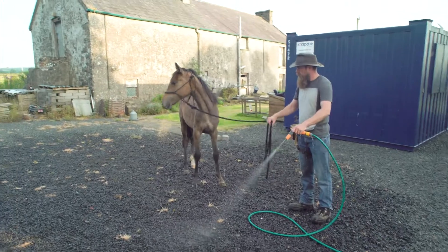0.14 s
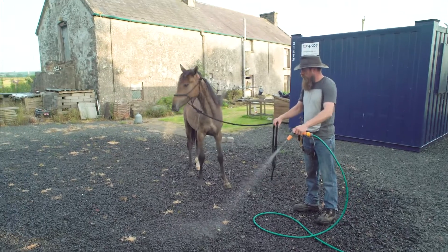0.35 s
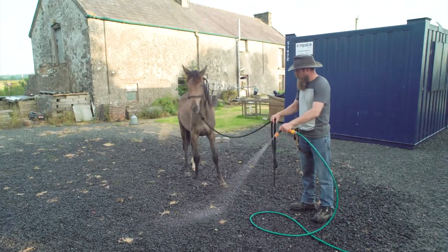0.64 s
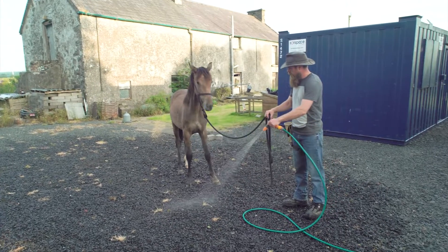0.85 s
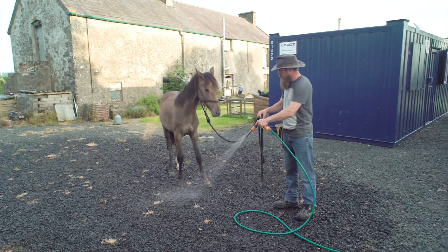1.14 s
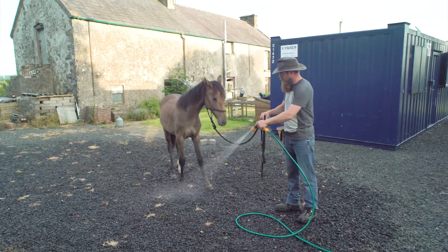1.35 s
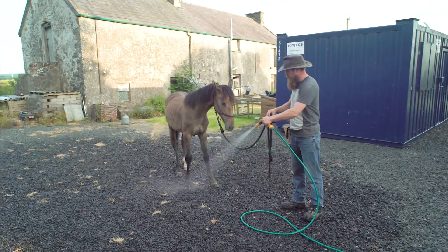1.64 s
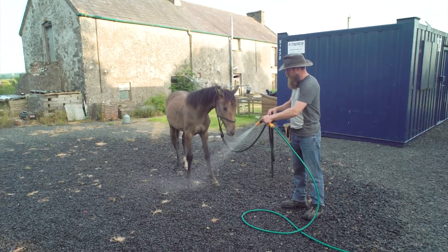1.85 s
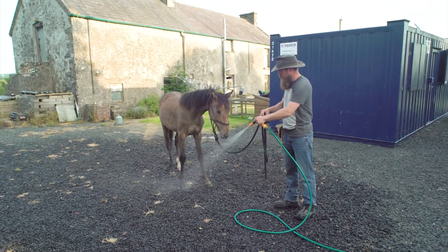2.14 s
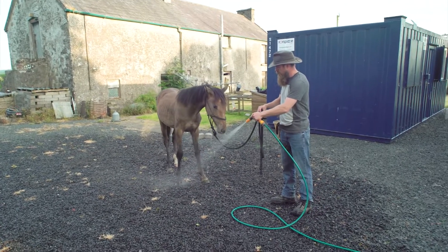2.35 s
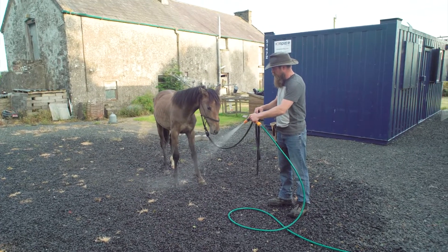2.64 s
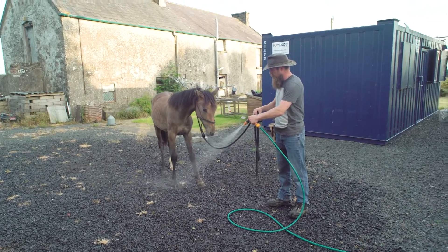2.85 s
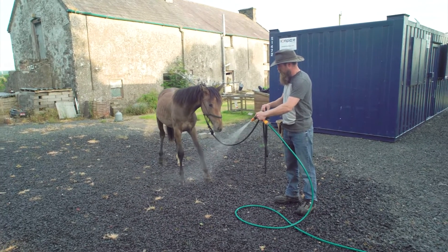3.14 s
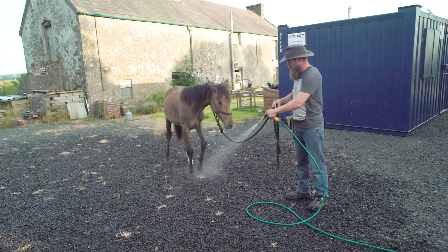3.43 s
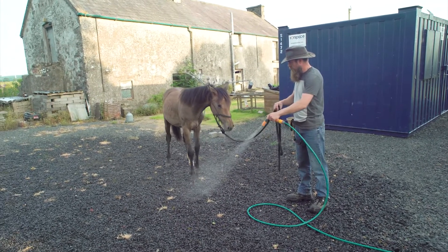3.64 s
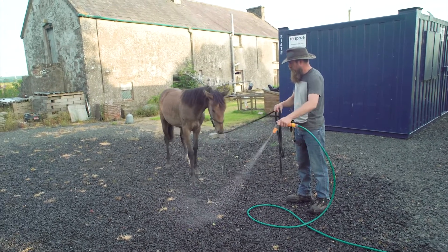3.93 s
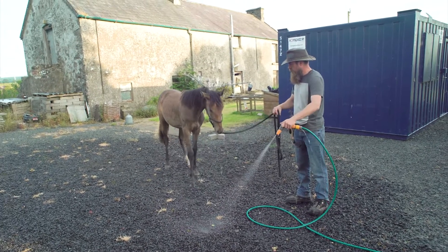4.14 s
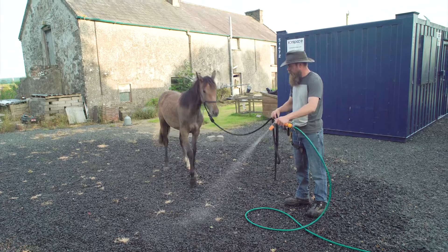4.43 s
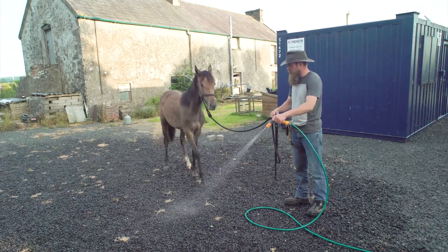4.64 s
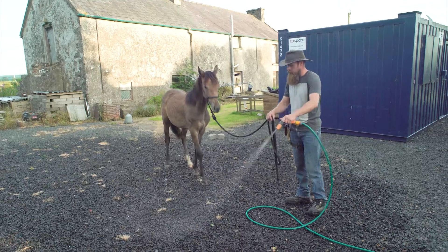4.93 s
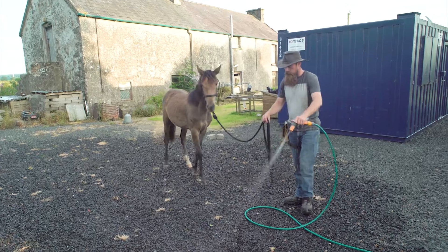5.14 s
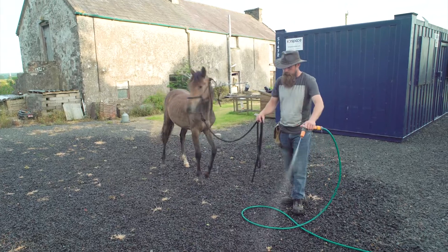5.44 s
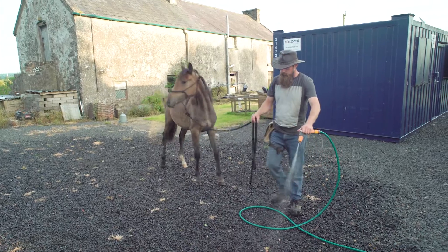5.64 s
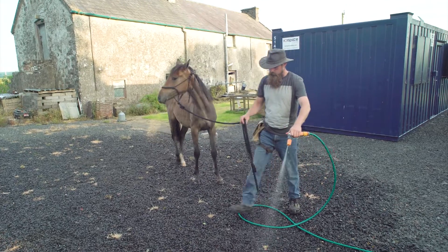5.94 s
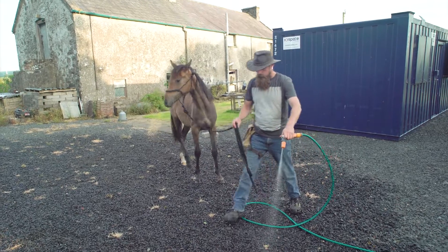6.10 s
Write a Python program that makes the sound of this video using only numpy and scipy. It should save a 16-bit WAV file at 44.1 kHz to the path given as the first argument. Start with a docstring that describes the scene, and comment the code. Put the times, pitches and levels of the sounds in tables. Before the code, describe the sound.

Water from a hose hisses and patters on wet gravel and a horse outdoors, with scattered crunching hoof and boot steps.

```python
"""Hosing down a horse

A garden hose sprays farmyard gravel and a young horse's legs. The jet is a cloud of tiny impacts that
hisses on bare stone and dulls on the wet coat; big drops tick and plip. Hooves and boots knock and
crunch in the gravel, and the yard walls answer dully. Underneath, the air rumbles faintly, the
hand-held microphone sways and one gust buffets it."""
import sys
import numpy as np
from scipy import signal
from scipy.fft import rfft, irfft, next_fast_len
from scipy.io import wavfile
from scipy.ndimage import uniform_filter1d

SR = 44100
rng = np.random.default_rng(int(sys.argv[2]) if len(sys.argv) > 2 else 0)


def put_to_file(sound):
    """Save the sound as 16-bit audio at rate SR, in the file named by the first command-line argument."""
    columns = np.atleast_2d(sound).T  # one column per channel
    safe = np.clip(columns, -1, 1)
    whole_steps = np.round(safe * 32767)
    wavfile.write(sys.argv[1], SR, whole_steps.astype(np.int16))


N = 276507
TIME = np.arange(N) / SR
ON_LEGS_S, OFF_LEGS_S, AT_BOOTS_S = 2.1, 3.4, 5.08   # where the jet is aimed

# Levels in the tables are relative: each layer sets its own trim.
# how hard the jet lands as the nozzle swings about: (time [s], level [dB])
JET_STRENGTH = [(0.0, 3.5), (0.2, 3), (0.32, 3), (0.41, 5), (0.53, 3), (0.76, 0.5), (1.75, -3.5), (1.9, -4),
                (2.02, -1.5), (2.87, -2), (2.95, -2.5), (3.05, -2.5), (3.51, -5.5), (3.61, -2.5),
                (3.93, -1.7), (4.09, 2.5), (4.43, 4.0), (4.66, -1.2), (4.77, -1), (4.8, 3), (4.95, 0.5),
                (5.31, 1.9), (5.39, 3.5), (5.81, 5), (6.27, 7)]
# tone of the wash and splash: (frequency [Hz], gain [dB])
WATER_EQ = [(100, -30), (180, -9.5), (310, -6.5), (460, -2), (630, -7), (740, -5), (980, -6), (1400, -3),
            (2400, 3.5), (3150, -2), (3700, 0), (4600, -5), (5600, 0.5), (7500, -3)]
# tone of the fine mist: (frequency [Hz], gain [dB])
MIST_EQ = [(6000, -3), (7500, -1.7), (8600, -3), (10000, -1.2), (12300, 0), (14500, -1), (16000, -2.5)]
# by the boots the mist loses its sheen: (frequency [Hz], gain [dB])
BOOTS_EQ = [(6000, 5.0), (9000, 1.5), (12500, -0.5), (15500, -3.5)]
# a slight scoop in the mist of a strong jet: (frequency [Hz], gain [dB])
STRONG_JET_EQ = [(6500, -0.77), (8500, -1.5), (10500, -0.3), (13000, -0.2)]
# the jet slaps a leg or a puddle: (time [s], level [dB], half length [s], centre [Hz], Q)
JET_SLAPS = [(0.188, -43, 0.011, 3400, 1.1), (0.395, -44.5, 0.025, 3000, 1.3),
             (0.44, -47, 0.027, 3400, 2.5), (1.1, -56, .05, 2000, 1.5), (2.135, -54, 0.063, 2200, 1.1),
             (2.631, -47, 0.013, 3600, 1.5), (2.825, -51, 0.025, 3600, 3.2), (3.07, -52, .02, 3680, 3.4),
             (3.138, -46, 0.007, 3680, 3.2), (3.246, -48.5, 0.045, 3430, 3.2),
             (3.432, -50, 0.024, 3500, 4.2), (3.632, -51, 0.033, 3620, 5.6), (5.767, -44, 0.018, 3950, 3.8),
             (6.174, -51, 0.12, 3830, 4.5)]
# the spray rings hollow near the boots: (time [s], level [dB], half length [s], pitch [Hz])
HOLLOW_RINGS = [(5.168, -53.5, 0.11, 745), (5.2, -52.5, 0.058, 1196), (5.487, -52, 0.068, 735)]
# the biggest drops crack on stone: (time [s], level [dB], pitch [Hz])
DROP_TICKS = [(0.1765, -31, 13200), (0.291, -26, 9200), (0.4527, -29.5, 11200), (1.0152, -34, 11000),
              (1.0417, -36, 11000), (1.335, -26.5, 12700), (1.578, -36, 12200), (1.6284, -34, 13400),
              (1.8116, -30, 12400), (1.8255, -35, 12000), (1.9696, -35, 12500), (2.0844, -29, 11900),
              (2.0993, -37, 9500), (2.1531, -36, 12500), (2.211, -35.5, 9000), (2.2655, -33, 10300),
              (2.3526, -31, 10700), (2.4071, -32, 10100), (2.4748, -38, 11000), (2.5202, -36, 6700),
              (2.7731, -36, 6400), (2.861, -27.5, 9300), (3.0283, -35, 9500), (3.1005, -35, 10000),
              (3.1553, -37, 7900), (3.408, -36, 13000), (3.6917, -34, 13500), (3.7779, -31, 13500),
              (3.9426, -32, 11800), (3.9689, -33, 12300), (3.9735, -32, 11200), (3.9962, -29.5, 13700),
              (4.0638, -24, 13000), (4.0755, -31, 12400), (4.2283, -33, 3700), (4.4537, -33, 6700),
              (4.5396, -28, 12000), (4.7848, -31, 12700), (5.0222, -31, 12000), (5.3758, -29, 11700),
              (5.706, -25.5, 5900), (5.8716, -27, 12000), (5.8772, -27, 7900)]
# trapped bubbles and loose pebbles ring briefly: (time [s], level [dB], pitch [Hz], Q)
DROP_PLIPS = [(0.5773, -46, 3650, 5), (0.7077, -34.5, 2620, 4.4), (0.8327, -43, 6460, 4),
              (1.213, -43.5, 3860, 7), (1.4998, -42, 4070, 5), (1.729, -46.5, 3100, 5),
              (2.2548, -36.5, 4050, 4), (2.4263, -37.5, 5330, 8), (2.632, -48, 1740, 5),
              (3.1415, -44, 6400, 4), (3.5455, -44, 3300, 5.5), (5.2159, -44, 5240, 5),
              (5.231, -38, 4280, 4), (5.3957, -39, 3950, 4), (5.4216, -39, 5800, 6), (5.5857, -35, 5400, 8),
              (5.9213, -37.5, 5970, 6)]
# hooves and boots land on gravel: (time [s], knock [dB], knock pitch [Hz], knock Q, crack [dB],
# crunch [dB], crunch decay [s], thud [dB])
FOOTFALLS = [(0.23, -43, 430, 4.4, -50, -62, .01, -72), (0.512, -40.5, 825, 2.9, -46, -63, .01, -77),
             (1.048, -28.5, 1750, 1.5, -35, -46, .016, -71), (3.316, -35, 1570, 2, -35, -47, .014, -67),
             (3.607, -37, 1100, 1.4, -38, -43.5, 0.014, -49),
             (3.616, -32.5, 560, 1.8, -42, -44.5, 0.01, -46), (3.618, -33.5, 217, 1.9, -50, -55, .01, -52),
             (3.646, -30.5, 1080, 2.8, -41, -50, 0.023, -46.5),
             (3.7871, -36, 1200, 2, -35, -45, 0.018, -48), (3.7885, -30, 680, 1.7, -39, -51, 0.013, -50),
             (3.7895, -32, 400, 2, -45, -54, .02, -54), (3.831, -35, 1040, 2.6, -43, -47, 0.058, -55),
             (4.123, -32, 1650, 1.6, -31, -42, 0.011, -60), (4.131, -38, 1000, 1.5, -38, -57, 0.018, -62),
             (4.26, -35, 1100, 1.4, -33, -50, 0.022, -60), (5.2499, -30, 1130, 3.2, -27, -44, 0.0056, -53),
             (5.2512, -38, 500, 2.6, -40, -60, .005, -65), (5.4249, -27.5, 1520, 2.4, -25, -43, 0.011, -52),
             (5.6398, -28.5, 1050, 2.4, -34, -41, 0.0067, -49), (5.6412, -33, 2000, 2, -42, -50, .005, -65),
             (5.706, -31, 2200, 0.95, -27, -48, .003, -70), (5.751, -31, 2300, 1.5, -31, -44, .01, -53),
             (5.7858, -38, 520, 1.8, -38, -43, .015, -51), (5.915, -30, 1380, 2.6, -31, -44, .007, -59)]
# feet slide over gravel: (time [s], level [dB], half length [s], centre [Hz])
FOOT_SCUFFS = [(4.21, -55, 0.071, 1680), (4.806, -55, 0.011, 850), (5.54, -51, 0.016, 473),
               (5.832, -50.5, 0.034, 900)]
# stones ring on under a boot: (time [s], level [dB], pitch [Hz], time to fall 60 dB [s])
STONE_CLINKS = [(5.2506, -37, 1250, 0.04), (5.4256, -39, 1470, .03), (5.916, -37, 1300, .03)]
# jolts that rock the microphone: (time [s], level [dB], settling rate [dB/s])
MIC_JOLTS = [(0.0, -15.5, 110), (0.28, -26, 61), (0.85, -29, 31), (1.36, -24, 5), (2.64, -21, 60),
             (3.03, -28, 26), (3.55, -32, 37), (4.03, -32, 80), (4.42, -31, 24), (5.36, -32.5, 15),
             (6.05, -30.5, 34)]
# tone of that rocking, mostly subsonic: (frequency [Hz], gain [dB])
SWAY_EQ = [(3, -74), (8, -9), (12, 8.5), (16, -12), (24, -19), (40, -66), (80, -45.5), (200, -104)]
# the lumps of the gust: (time [s], level [dB])
GUST_BUFFETS = [(2.32, -38.5), (2.426, -39.5), (2.538, -29), (2.64, -22), (2.71, -28.5), (2.88, -42.5)]
# tone of wind on the microphone: (frequency [Hz], gain [dB])
GUST_EQ = [(15, 16.5), (28, 17), (42, 16), (60, 13.5), (85, 1.5), (170, -6.5), (260, -24), (500, -42),
           (1500, -90)]
# tone of the open air: (frequency [Hz], gain [dB])
YARD_EQ = [(25, -41), (42, 16.5), (52, 12.5), (68, -2), (100, -0.5), (170, -5.5), (280, -4), (450, -2),
           (750, -3.5), (2000, -26.5)]


def spray(wash_db=-53.5, splash_db=-49.0, mist_db=-50.5, flutter_db=0.77):
    """Countless droplets merge into a wash, a splash and a mist; larger ones patter and crackle."""
    wash_ride, splash_ride, mist_ride = jet_aim()
    water = rng.standard_normal(N) + patter(per_s=900, spread_db=4.0, q=4.6)
    wash = unit_rms(band(equalise(water, WATER_EQ), 212, 1790)) * from_db(wash_ride + wash_db)
    water += from_db(-4) * impacts(per_s=2500, spread_db=3.0, limit=6.2)
    splash = unit_rms(band(equalise(water, WATER_EQ), 2665, 5440)) * from_db(splash_ride + splash_db)
    hiss = mist(mist_ride) * from_db(mist_ride + mist_db)
    return (wash + splash + hiss) * from_db(flutter_db * drift(per_s=35))


def jet_aim():
    """Level rides in dB for wash, splash and mist: a harder jet is brighter, the wet coat duller."""
    jet = np.interp(TIME, *np.transpose(JET_STRENGTH))
    on_coat = swing(ON_LEGS_S) - swing(OFF_LEGS_S)
    wash = 0.36 * jet + 2 * swing(AT_BOOTS_S)   # fuller when aimed steeply down
    splash = 0.91 * jet + 0.2 * on_coat
    hiss = 1.35 * jet - on_coat
    return wash, splash, hiss


def swing(s, travel_s=0.074):
    """A fade from 0 to 1 as the jet moves onto a new surface at time s."""
    return np.clip((TIME - s) / travel_s + .5, 0, 1)


def mist(ride_db, dense_db=-2.0, strong_db=2.5):
    """The finest drops burst in a high hiss; where the mist is thin, single ones stand out."""
    bursts = impacts(per_s=1500, spread_db=3.9, limit=5.2)
    bursts += from_db(-3) * patter(per_s=170, spread_db=3.5, q=4.7)
    bursts *= from_db(3.5 + 0.19 * (dense_db - ride_db))
    hiss = equalise(rng.standard_normal(N) + bursts, MIST_EQ)
    hiss = signal.sosfilt(signal.butter(3, 6600, "high", fs=SR, output="sos"), hiss)
    hiss /= np.sqrt(uniform_filter1d(hiss ** 2, SR // 10))   # hold the level steady
    hiss = blend_eq(hiss, swing(AT_BOOTS_S), BOOTS_EQ)
    return blend_eq(hiss, np.clip(ride_db / strong_db, 0, 1), STRONG_JET_EQ)


def patter(per_s, spread_db, q):
    """Drops land on stones and water films of every size, each ringing for a few cycles."""
    pitches = np.geomspace(400, 15000, 16)
    return unit_rms(sum(resonate(impacts(per_s, spread_db, limit=5.5), hz, q) for hz in pitches))


def slaps():
    """The full jet on a wet surface fizzes with bubbles of about one size."""
    bubbles = impacts(per_s=2200, spread_db=4.0, limit=4.2)
    return sum(swell(focus(bubbles, hz, q), s, db, half_s) for s, db, half_s, hz, q in JET_SLAPS)


def hollow_rings(q=30, trim_db=-3.0):
    """Narrow resonances swell briefly out of the spatter."""
    return sum(swell(resonate(rng.standard_normal(N), hz, q), s, db + trim_db, half_s)
               for s, db, half_s, hz in HOLLOW_RINGS)


def big_drops(rows, splatter, splatter_s, trim_db):
    """Each drop is one sharp impact and a spatter of fragments, ringing at its own pitch."""
    out, t = np.zeros(N), TIME[:SR // 25]
    for s, db, hz, q in rows:
        fragments = splatter * rng.standard_normal(len(t)) * np.exp(-t / splatter_s)
        add(out, s, from_db(db + trim_db) * strike((t == 0) + fragments, hz, q))
    return out


def stray_drops(count, top_db, spread_db, low_hz, high_hz, q):
    """Lesser drops fall at random: rows of (time [s], level [dB], pitch [Hz], Q)."""
    when, softness, pitch = rng.random((count, 3)).T
    levels = top_db - spread_db * softness
    pitches = low_hz * (high_hz / low_hz) ** pitch
    return [(s, db, hz, q) for s, db, hz in zip(when * TIME[-1], levels, pitches)]


def footfalls(rebound=0.18, rebound_s=0.00158, knock_trim_db=-1.5, crunch_trim_db=-1, thud_trim_db=2.5):
    """Stones crack together, rebound and grind as they settle; the ground thuds under the weight."""
    out, t = np.zeros(N), TIME[:SR // 6]
    grit = unit_rms(band(impacts(per_s=3500, spread_db=2.5, limit=3.4), 380, 5500, order=1))
    contact = 1.0 * (t == 0)
    add(contact, rebound_s, np.array([rebound]))
    for s, knock_db, hz, q, crack_db, crunch_db, crunch_s, thud_db in FOOTFALLS:
        crunch = grit[int(s * SR):][:len(t)] * np.exp(-t / crunch_s)
        thud = unit_rms(band(rng.standard_normal(len(t)), 130, 720)) * np.exp(-t / 0.012)
        add(out, s, from_db(knock_db + knock_trim_db) * strike(contact, hz, q))
        add(out, s, from_db(crack_db) * strike(contact, hz=3600, q=0.8))
        add(out, s, from_db(crunch_db + crunch_trim_db) * crunch)
        add(out, s, from_db(thud_db + thud_trim_db) * thud)
    return out


def scuffs(q=1.4):
    """A sliding foot rolls many small stones over each other."""
    stones = impacts(per_s=1200, spread_db=3.5, limit=4.0)
    return sum(swell(focus(stones, hz, q), s, db, half_s) for s, db, half_s, hz in FOOT_SCUFFS)


def clinks():
    """A knocked stone rings on in one clear, dying mode."""
    out, t = np.zeros(N), TIME[:SR // 5]
    for s, db, hz, t60 in STONE_CLINKS:
        add(out, s, from_db(db - 60 * t / t60) * np.sin(2 * np.pi * hz * t))
    return out


def walls(x, echo_db=-15.5, delays_s=(.023, .041, .078)):
    """A steel container and the barn add a few dull echoes, each weaker than the last."""
    out, dull = x.copy(), band(x, 200, 3500, order=1)
    for k, s in enumerate(delays_s, start=1):
        add(out, s, from_db(echo_db) / k * dull)
    return out


def gust(rise_db_per_s=255, fall_db_per_s=240):
    """Eddies buffet the microphone in one lumpy gust."""
    buffets = [db + peak_ramp(s, rise_db_per_s, fall_db_per_s) for s, db in GUST_BUFFETS]
    return from_db(np.max(buffets, axis=0)) * steady_noise(GUST_EQ, window=SR // 12)


def mic_sway(rise_db_per_s=95, rest_db=-42):
    """The hand-held microphone rocks with each jolt and settles: a subsonic wobble."""
    jolts = [db + peak_ramp(s, rise_db_per_s, fall) for s, db, fall in MIC_JOLTS]
    ride_db = np.maximum(np.max(jolts, axis=0), rest_db)
    return from_db(ride_db) * steady_noise(SWAY_EQ, window=SR // 6)


def yard_air(level_db=-58.0):
    """A faint bed of open-air rumble."""
    return from_db(level_db) * unit_rms(equalise(rng.standard_normal(N), YARD_EQ))


def impacts(per_s, spread_db, limit):
    """Random clicks, many small and a few large, spanning spread_db * limit decibels."""
    sizes = from_db(spread_db * np.minimum(rng.exponential(1, N), limit))
    hits = rng.random(N) < per_s / SR
    return unit_rms(hits * sizes * rng.choice([-1, 1], N))


def steady_noise(eq, window):
    """Shaped noise with its power evened out over a window of samples."""
    noise = equalise(rng.standard_normal(N), eq)
    return noise / np.sqrt(uniform_filter1d(uniform_filter1d(noise ** 2, window), window))


def drift(per_s):
    """A wander through per_s random values a second."""
    knots = rng.standard_normal(4096)
    return np.interp(TIME * per_s, np.arange(len(knots)), knots)


def swell(x, s, db, half_s):
    """Fade a texture in and out on a bell curve that tops out at time s."""
    return from_db(db) * np.exp(-((TIME - s) / half_s) ** 2) * unit_rms(x)


def peak_ramp(s, rise, fall):
    """A level that climbs to 0 dB at time s and sinks again, at rates in dB per second."""
    return -np.maximum(rise * (s - TIME), fall * (TIME - s))


def resonate(x, hz, q):
    """One resonance with unity gain at its peak."""
    radius = np.exp(-np.pi * hz / q / SR)
    feedback = [1, -2 * radius * np.cos(2 * np.pi * hz / SR), radius ** 2]
    return signal.lfilter(np.array([1, 0, -1]) * (1 - radius ** 2) / 2, feedback, x + 1e-18)


def focus(x, hz, q):
    """Two resonances in series, the second twice as wide."""
    return resonate(resonate(x, hz, q), hz, q / 2)


def strike(push, hz, q):
    """The short ring that a push excites, scaled to a peak of 1."""
    ring = focus(push, hz, q)
    return ring / np.abs(ring).max()


def band(x, low_hz, high_hz, order=2):
    """Band-pass filter."""
    return signal.sosfilt(signal.butter(order, [low_hz, high_hz], "band", fs=SR, output="sos"), x)


def equalise(x, eq):
    """Apply an EQ curve of (frequency [Hz], gain [dB])."""
    hz, db = np.transpose(eq)
    size = next_fast_len(N + SR)
    bins = np.fft.rfftfreq(size, 1 / SR)
    gain = from_db(np.interp(np.log(bins + 1e-9), np.log(hz), db))
    return irfft(rfft(x, size) * gain, size)[:N]


def blend_eq(x, share, eq):
    """Crossfade a sound towards an equalised copy."""
    return x + share * (equalise(x, eq) - x)


def from_db(db):
    """Decibels to gain."""
    return 10 ** (np.asarray(db) / 20)


def unit_rms(x):
    """Scale to unit power."""
    return x / np.sqrt(np.mean(x ** 2) + 1e-20)


def add(out, s, sound):
    """Mix a sound in at time s."""
    at = max(0, round(s * SR))
    out[at:at + len(sound)] += sound[:N - at]


def scene():
    """Water and feet echo off the walls, over a bed of air and wind; mono."""
    ticks = [(s, db, hz, 1.63) for s, db, hz in DROP_TICKS]   # one low Q keeps them dry
    ticks += stray_drops(count=26, top_db=-33, spread_db=6, low_hz=9500, high_hz=14000, q=1.6)
    plips = DROP_PLIPS + stray_drops(count=8, top_db=-48, spread_db=8, low_hz=2700, high_hz=6400, q=5)
    drops = big_drops(ticks, splatter=0.16, splatter_s=0.0012, trim_db=2.5)
    drops += big_drops(plips, splatter=0.11, splatter_s=0.0027, trim_db=8.0)
    water = spray() + slaps() + hollow_rings() + drops
    feet = footfalls() + scuffs() + clinks()
    return (walls(water + feet) + yard_air() + mic_sway() + gust())[None]


def record(dry, cutoff_hz=15900):
    """A steep low-pass takes off the very top."""
    return signal.sosfilt(signal.ellip(12, .1, 80, cutoff_hz, fs=SR, output="sos"), dry)


dry = scene()
out = record(dry)
put_to_file(out)
```